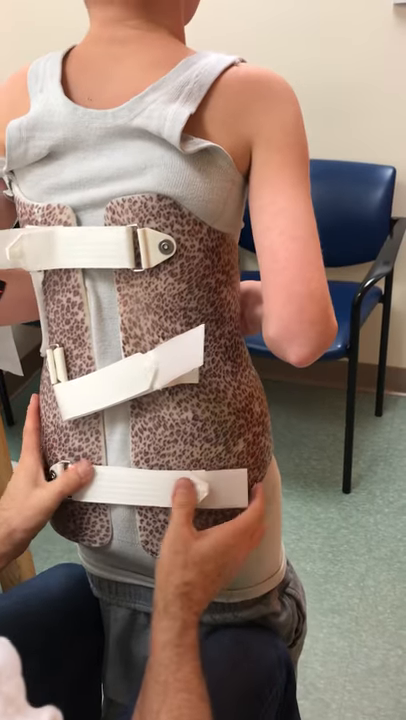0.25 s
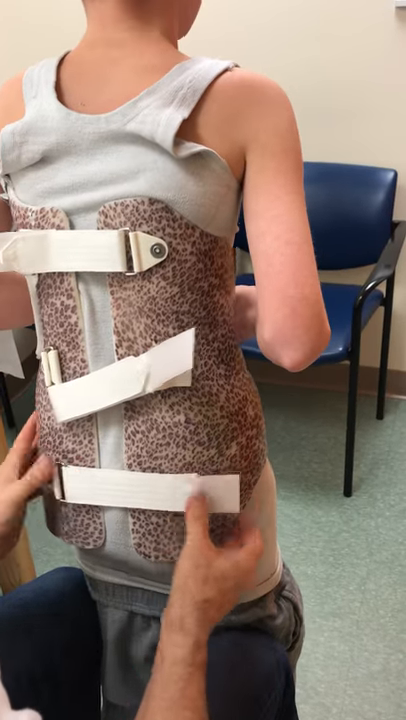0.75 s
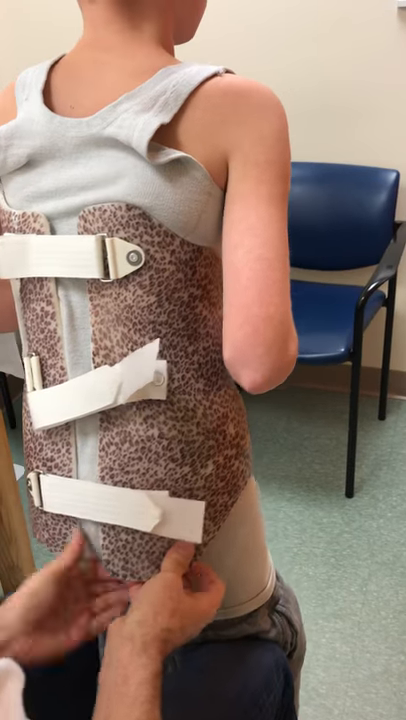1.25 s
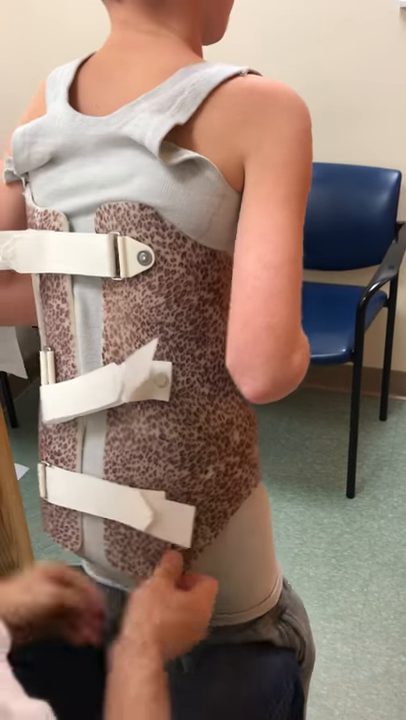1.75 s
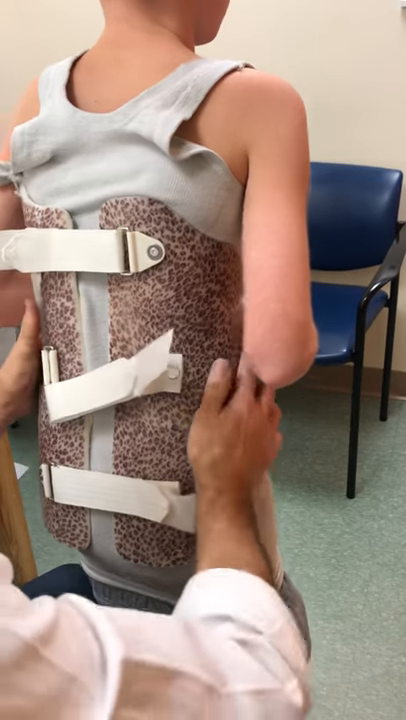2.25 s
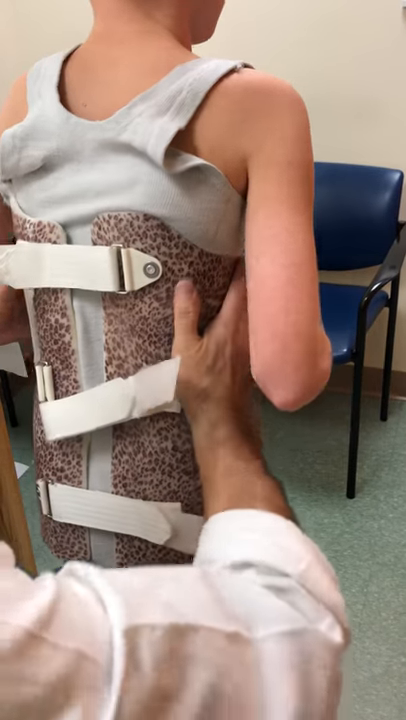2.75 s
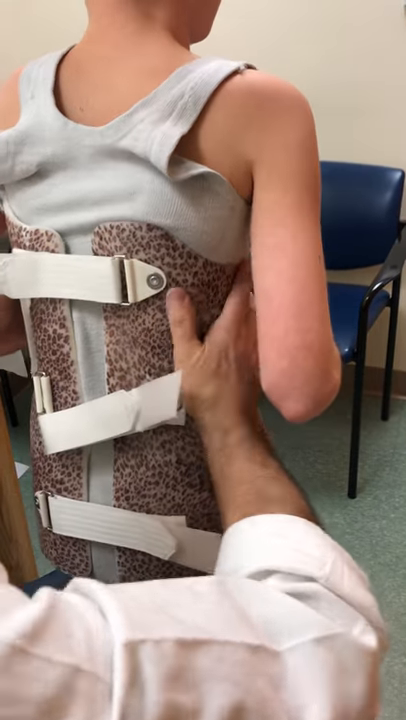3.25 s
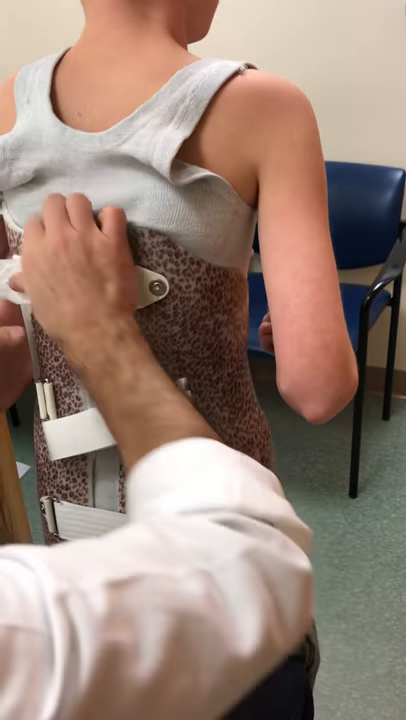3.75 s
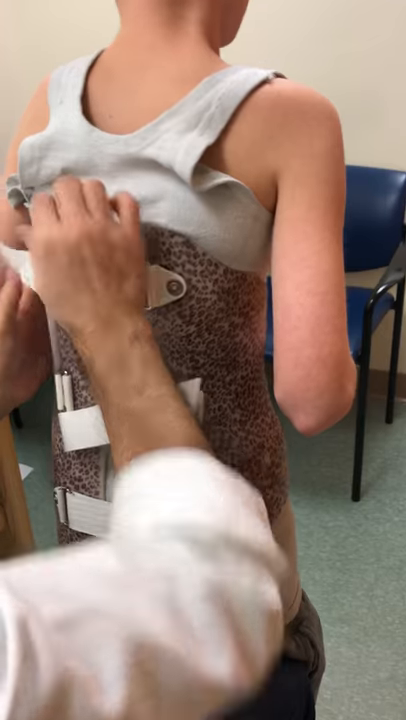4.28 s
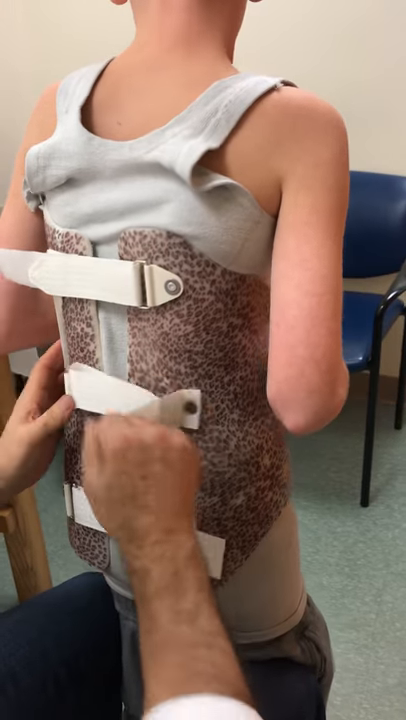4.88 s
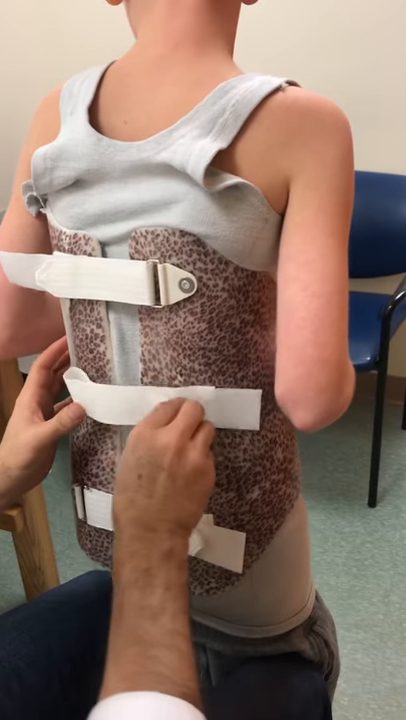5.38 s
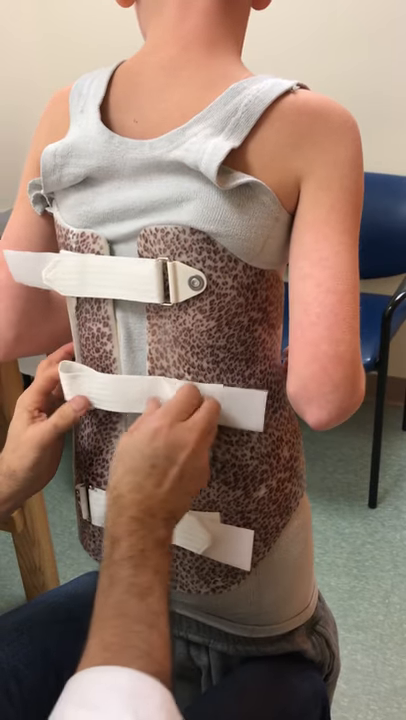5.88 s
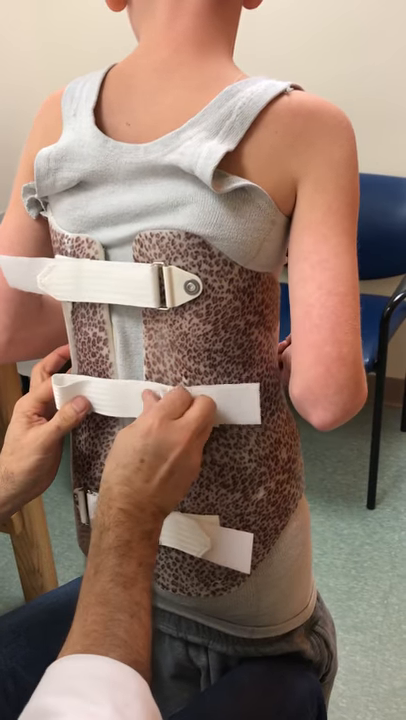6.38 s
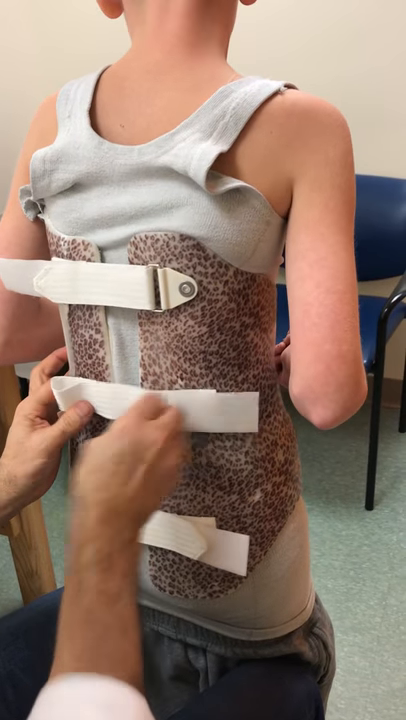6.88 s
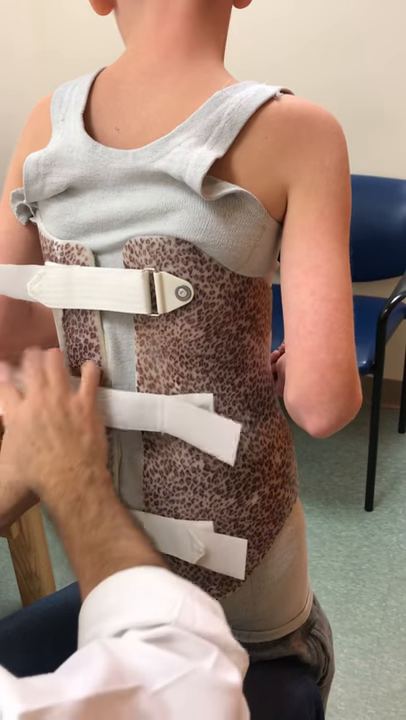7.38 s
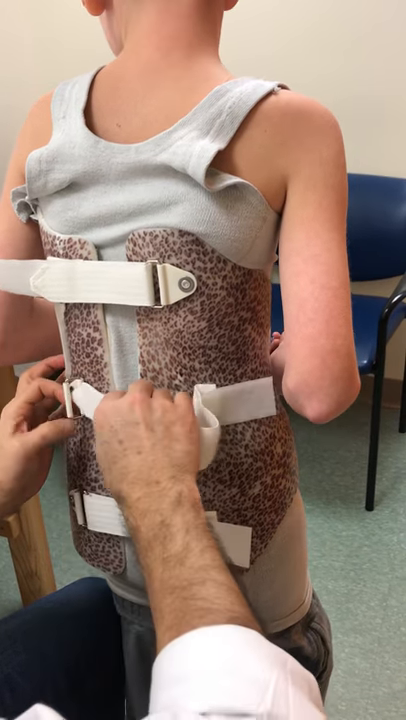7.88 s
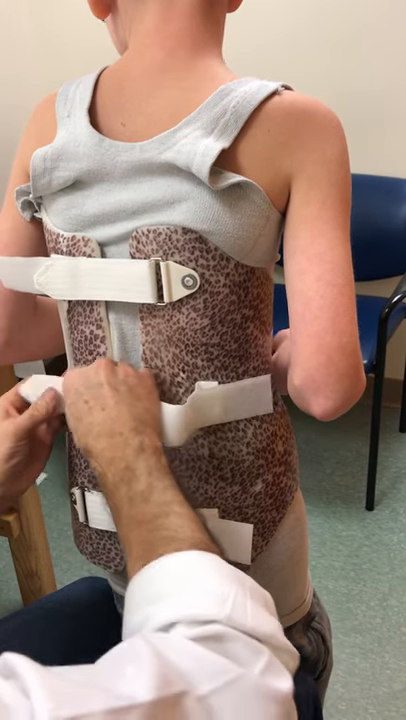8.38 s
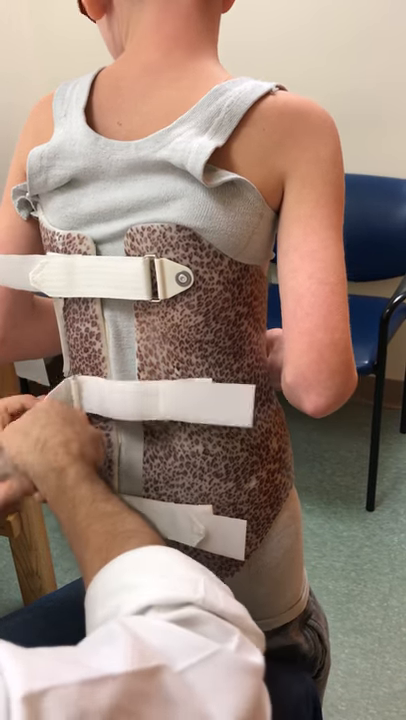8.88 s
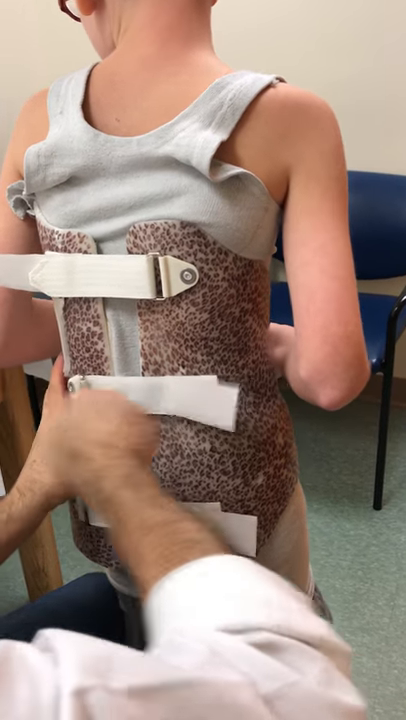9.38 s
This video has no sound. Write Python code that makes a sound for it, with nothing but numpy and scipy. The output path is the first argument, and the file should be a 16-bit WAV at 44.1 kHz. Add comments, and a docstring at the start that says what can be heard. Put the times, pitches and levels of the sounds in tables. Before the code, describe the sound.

Close up in a small quiet room, hands brush over a hard plastic back brace with soft, uneven rustles and tiny hook-and-loop ticks. After a quieter stretch of handling and a few hollow knocks, a strap rips in two quick, harsh bursts in the middle. Brisk fabric scuffs, webbing drags and faint snaps follow. A low mains hum and soft air rush stay underneath.

```python
"""Hook-and-loop straps of a stiff plastic back brace snap and rip as hands adjust them in a small room.
Hooks are noise cracks with a short ring: single as a strap is picked at, in dense runs for two pulls and drags.
Fingers and buckles knock or judder on the shell as damped sines; rubbing and rustling are coloured noise catches.
A faint mains hum of wavering sines and a low rush of noise lie beneath; decaying noise gives the room's answer."""
import sys
import numpy as np
from scipy import signal
from scipy.fft import rfft, irfft, next_fast_len
from scipy.io import wavfile
from scipy.ndimage import map_coordinates

SR = 44100
rng = np.random.default_rng(int(sys.argv[2]) if len(sys.argv) > 2 else 0)


def transcribe(signal):
    """Save signal, clipped to [-1, 1], as a 16-bit WAV file at the path in sys.argv[1]."""
    frames = np.atleast_2d(signal).T
    limited = np.clip(frames, -1, 1)
    pcm = np.round(limited * 32767).astype(np.int16)
    wavfile.write(sys.argv[1], SR, pcm)


N = 425124

# Levels below are relative: each layer adds its own trim.
# Single hooks letting go, from faint ticks to sharp snaps.
# Each row: time in seconds, level in dB, ring in Hz, brightness in dB.
HOOK_SNAPS = [(0.0605, -34.5, 3520, -2), (0.226, -43, 6800, -3), (0.3355, -39, 3520, -19),
              (0.4, -37.5, 2580, -18), (0.5517, -40.5, 5300, -5), (0.649, -27, 3700, -31),
              (0.698, -30.5, 3740, -34), (0.7436, -31.5, 3540, -20), (0.8317, -36, 3520, -4),
              (0.8936, -31, 6700, -12), (0.9015, -31.5, 3930, -13), (0.9965, -41, 5400, 3),
              (1.489, -37, 7600, 5), (1.5322, -34, 3720, 6), (1.631, -36, 3760, 7),
              (2.0363, -32, 4630, -22), (2.2188, -39, 4560, 7), (2.278, -36, 4450, -5),
              (2.9035, -52, 5500, -17), (2.9603, -43, 6100, -33), (3.053, -49.5, 4000, -1),
              (3.0957, -41, 7600, 11), (3.215, -48, 2200, -10), (3.2593, -41.5, 2170, -28),
              (3.285, -52, 3000, -22), (3.3473, -54, 2780, -36), (3.388, -52, 2400, -24),
              (3.8184, -33.5, 5700, 6), (4.098, -40, 4200, -8), (4.3337, -31, 2050, -5),
              (4.4853, -39.5, 7300, -1), (4.7138, -33, 2820, -14), (5.0948, -28, 4460, 1),
              (5.365, -34, 4250, 0), (5.545, -39.5, 4570, -6), (5.6971, -37, 3600, 0.5),
              (5.7691, -37, 6030, -2), (5.8544, -38.5, 2830, 3), (6.0026, -36.5, 7300, 1),
              (6.0933, -35.5, 2820, -4), (6.3029, -35, 3900, 6), (6.321, -38, 3800, 3),
              (6.3247, -33, 3100, -1), (6.3336, -17, 2650, 3), (6.3417, -33, 3000, 3),
              (6.3563, -22.5, 3020, -9), (6.372, -21.5, 3740, -14), (6.376, -24, 7050, -5),
              (6.3927, -22.5, 5300, 1.5), (6.4285, -32, 2760, -9), (6.5843, -36, 2730, -6),
              (6.6143, -20, 3900, 0), (6.6185, -16.5, 2520, -8), (6.629, -19.5, 3020, -2),
              (6.6497, -18, 3920, -11), (6.6791, -23, 3300, -20), (6.6941, -27, 6500, -7),
              (6.9021, -22.5, 4370, -10), (6.952, -30, 3900, 4), (6.9569, -16.5, 4100, -17),
              (7.441, -33.5, 3660, 10), (7.5963, -38.5, 6000, 21), (7.8398, -33, 6400, 7),
              (8.063, -33, 7240, 7), (8.092, -32, 6200, 2), (8.122, -34.5, 7000, -2),
              (8.2249, -37, 6500, -8), (8.7507, -33.5, 7340, 11), (9.181, -31, 7600, 12),
              (9.201, -37, 7500, 23), (9.4115, -37.5, 5950, 4), (9.441, -37, 6460, 11)]
# Fingers, strap ends and buckles meeting the shell.
# Each row: time in seconds, level in dB, pitch in Hz, crack over ring in dB.
SHELL_KNOCKS = [(1.0342, -49.5, 368, -4), (1.343, -42, 1230, 4), (1.672, -52.5, 900, -4),
                (1.883, -42.5, 670, -18), (1.528, -46, 1230, -4), (2.9285, -52, 1120, -15),
                (3.029, -50, 1310, -3.5), (3.1213, -46, 720, -1.5), (3.8952, -41.5, 890, -16),
                (4.203, -50, 1300, 1), (4.3334, -36.5, 1590, -4), (4.7855, -40, 726, 6),
                (4.8963, -27, 1170, -2.5), (5.1531, -40, 1000, 2), (5.3737, -37.5, 1800, 0),
                (5.3772, -39.5, 1410, 0), (6.5143, -42.5, 1240, -1), (7.8383, -43.5, 2000, -1),
                (7.902, -40.5, 1020, 7), (8.0587, -43.5, 630, -2), (8.096, -44, 603, 2),
                (8.1286, -43, 680, -20), (8.2578, -48, 870, 4), (8.37, -49, 696, -1), (8.385, -48, 1900, 0),
                (8.662, -40, 740, -1.5)]
# A fingertip juddering over the plastic. Each row: start in seconds, length in seconds, level in dB, pitch in Hz.
FINGER_JUDDERS = [(3.404, 0.047, -49.5, 724), (3.49, .026, -51, 710), (5.145, .045, -54, 344),
                  (8.003, .3, -59, 645), (8.466, .04, -49.5, 414), (8.599, .11, -57, 630)]
# Tone of the hooks. Each row: frequency in Hz, gain in dB.
HOOK_TONE = [(100, -24), (400, -13), (900, -7), (1700, -7), (2500, -0.5), (3600, 1), (5000, 1), (7000, 1.5),
             (10000, 0), (16000, 3)]
# Tone of palms rubbing the hollow shell. Each row: frequency in Hz, level in dB per Hz.
RUB_TONE = [(100, -30.5), (300, -1), (480, -7.5), (640, 0.5), (900, -2.5), (1600, 0), (2400, -2.5),
            (4000, -12.5), (9000, -47)]
# Tone of sleeves and webbing. Each row: frequency in Hz, level in dB per Hz.
CLOTH_TONE = [(600, -27), (1800, -20.5), (2800, -1), (3700, 1.5), (5000, -1), (6700, 1), (9000, -13.5),
              (12000, -9.5)]
# Tone of the fine fibre hiss. Each row: frequency in Hz, level in dB per Hz.
HISS_TONE = [(4000, -30.5), (7500, -11.5), (9000, -1.5), (10400, -12.5), (12000, -3), (16000, -8.5)]
# Tone of the room's low rush. Each row: frequency in Hz, level in dB per Hz.
AIR_TONE = [(20, -22.5), (35, -18), (55, 6.5), (80, -3.5), (130, -7.5), (190, -7.5), (280, -13), (450, -19),
            (1000, -26), (3000, -28), (16000, -38)]
# Mains hum partials. Each row: frequency in Hz, level in dB about which it wavers.
HUM_PARTIALS = [(59.2, -62.5), (117.5, -81), (176.2, -64.5), (233, -73)]
# Decay of the room. Each row: frequency in Hz, time to fall 60 dB in seconds.
ROOM_DECAY = [(200, 0.42), (800, 0.24), (2000, 0.22), (5000, 0.2), (10000, 0.17), (16000, 0.12)]
# Tone of a hard contact. Each row: frequency in Hz, gain in dB.
CRACK_TONE = [(300, -65), (1200, -21), (2200, 1), (3700, 5.5), (5000, -3.5), (9000, -3.5), (16000, -7)]
# Strokes of a hand, sleeve or strap over the brace. Each row: start in seconds, length in seconds,
# cloth level in dB, shell rub over cloth in dB, fine hiss over cloth in dB.
HAND_STROKES = [(0.0, 0.24, -55.5, -8, 0), (0.2, 0.23, -52, -14, -7), (0.433, 0.17, -57, -8.5, 0),
                (0.537, 0.26, -50.5, -11, -3), (0.807, 0.16, -55.5, -5.5, -4),
                (0.96, 0.12, -62.5, -1.5, -2), (1.34, 0.24, -63.5, -7, 1), (1.466, 0.094, -49, -9, 0),
                (1.616, 0.28, -61, -2, -3.5), (2.115, 0.081, -61.5, 0.5, -3), (2.257, 0.06, -62, -10, -7),
                (2.426, 0.15, -64.5, 1, -6), (2.503, 0.16, -60, -4.5, -1.5), (2.676, 0.15, -70, -2, -1),
                (2.828, 0.08, -63.5, -3, 0), (2.917, 0.13, -74.5, 8, -18), (3.086, 0.3, -69, 5.5, -11),
                (3.478, 0.067, -66, -5, 6), (3.783, 0.19, -52.5, -11, 1.5),
                (4.015, 0.15, -51.5, -13.5, -4.5), (4.177, 0.23, -54.5, -11, -4.5),
                (4.47, 0.057, -61, 0, 2), (4.691, 0.086, -57, -2, -8), (4.771, 0.1, -53, 0, -4),
                (5.076, 0.094, -51, 2, -2), (5.304, 0.13, -55, -4, -6), (5.422, 0.13, -52.5, -15, -7),
                (5.62, 0.35, -60, -5.5, -3), (5.951, 0.074, -48.5, -12.5, -6), (6.042, 0.066, -55, -8, -13),
                (6.14, 0.25, -64.5, -20, 1.5), (6.287, 0.32, -54.5, -8, -10),
                (6.728, 0.2, -53.5, -13, -6.5), (7.209, 0.2, -59.5, -1.5, -2), (7.329, 0.06, -49, -10.5, 2),
                (7.422, 0.086, -51.5, -0.5, -6), (7.542, 0.08, -53.5, -1.5, 1),
                (7.696, 0.07, -58.5, -9, 4.5), (7.829, 0.074, -57.5, -8, -13), (8.002, 0.04, -59, 0, -5),
                (8.048, 0.09, -50.5, -3, -11), (8.25, 0.054, -49, -5, -5), (8.335, 0.13, -56, -4, 2.5),
                (8.441, 0.083, -46, -6, -8), (8.553, 0.072, -49, -3.5, -6), (8.644, 0.077, -56, 2.5, -2),
                (8.757, 0.13, -47.5, -7, 1), (8.946, 0.09, -45, -8.5, -2), (9.077, 0.16, -50, -15.5, 3),
                (9.243, 0.06, -59.5, -15, 2), (9.404, 0.12, -51.5, -15, 2), (9.592, 0.083, -61, -14, 0)]
# The two pulls that rip the strap open.
# Each row: time in seconds, level in dB, brightness in dB, flap of the loose strap in dB.
FIRST_RIP = [(6.614, -27, -8, -8), (6.627, -20.5, -14, -9), (6.638, -27, -4.5, -9.5),
             (6.682, -28.5, -16, -12)]
SECOND_RIP = [(6.941, -22.5, -0.5, -17), (6.963, -21, 2, -26), (6.985, -15.5, -4.5, -38),
              (7.0, -19, -7.5, -17), (7.025, -19, 6.5, -13.5), (7.048, -14, -0.5, -17.5),
              (7.077, -15.5, -1, -12)]
# A strap dragging over hooks or through its buckle. Each row: start in seconds, length in seconds,
# level in dB, hooks a second, ring in Hz, brightness in dB, flap in dB.
STRAP_DRAGS = [(0.385, 0.03, -44, 720, 3670, -4, -4.5), (3.81, 0.08, -49, 610, 6040, -3, -22),
               (4.34, 0.023, -42.5, 590, 3640, -12, -19), (5.1, 0.049, -39, 1200, 3560, -1, -21),
               (6.84, 0.034, -41.5, 500, 3250, -3.5, -18.5), (6.902, 0.029, -38, 420, 3400, -5, -28),
               (8.777, 0.087, -42.5, 1680, 4240, -3.5, -3.5), (5.363, 0.025, -50.5, 1200, 2570, -16, 3),
               (5.456, 0.013, -42, 560, 3800, -3, -8), (9.475, 0.05, -47, 1600, 2960, -9, -34)]
# A click reaches three nearby surfaces one after another. Each entry: delay in seconds.
SURFACE_DELAYS = [0.0, 0.0023, 0.0051]

ATTACK_S, ARCH_DB, RELEASE_DB_PER_S = 0.013, 3.5, 282  # a stroke's rise, swell at its middle, and fall
SLOW_RATE, FAST_RATE, FAST_DB = 550, 2800, -15  # hooks a second at the slowest; more added at this pull level
RING_CYCLES = 0.36  # time constant of the shell's ring, in cycles of its pitch
FIDGET_DB = -74  # clothes never lie quite still between strokes
TOP_HZ = 16050  # band limit


def amp(db):
    """Decibels to amplitude."""
    return 10 ** (np.asarray(db) / 20)


def unit(x):
    """x at rms 1."""
    return x / np.sqrt(np.mean(x ** 2) + 1e-20)


def unit_rows(x):
    """Each row at energy 1."""
    return x / (np.linalg.norm(x, axis=-1, keepdims=True) + 1e-12)


def along(points, hz):
    """(Hz, value) points read on a log frequency axis."""
    f, v = np.transpose(points)
    return np.interp(np.log(hz + 1), np.log(f), v)


def wobble(rate):
    """A smooth random curve, rate knots a second."""
    knots = rng.standard_normal(int(N * rate / SR) + 4)
    return map_coordinates(knots, [np.arange(N) * rate / SR])


def filtered(x, response):
    """x times a response of frequency."""
    m = next_fast_len(N + SR // 2)
    return irfft(rfft(x, m) * response(np.fft.rfftfreq(m, 1 / SR)), m)[:N]


def coloured(x, points, size=2048):
    """x through a causal filter with the given (Hz, dB) gains."""
    # folding the cepstrum forward gives minimum phase, so no sound runs ahead of its click
    cepstrum = irfft(np.log(amp(along(points, np.fft.rfftfreq(size, 1 / SR)))))
    cepstrum[1:size // 2] *= 2
    cepstrum[size // 2 + 1:] = 0
    return signal.oaconvolve(x, irfft(np.exp(rfft(cepstrum))))[:N]


def placed(times, rows):
    """Short sounds, one a row, summed at their start times."""
    at = np.round(np.abs(times) * SR).astype(int)[:, None] + np.arange(rows.shape[1])
    return np.bincount(at.ravel(), rows.ravel(), N)[:N]


def strokes():
    """Strength of shell rub, cloth and hiss: each stroke rises, swells as the hand speeds up, and dies away."""
    power, t = np.zeros((3, N + SR)), np.arange(SR) / SR
    for start, length, db, rub_db, hiss_db in HAND_STROKES:
        arch = (2 * np.minimum(t / length, 1) - 1) ** 2
        fall_db = RELEASE_DB_PER_S * np.maximum(t - length, 0)
        shape = np.minimum(t / ATTACK_S, 1) * amp(db - ARCH_DB * arch - fall_db)
        first = round(start * SR)
        power[:, first:first + SR] += (amp([[rub_db], [0], [hiss_db]]) * shape) ** 2
    return np.sqrt(power[:, :N])


def friction(spectrum, rate, scatter_db, smooth_db, size=40):
    """Fibres catching at random, rate a second, over a smooth rush; rms 1."""
    rush = rng.standard_normal(N)
    times = rng.random(int(rate * N / SR)) * N / SR
    force = amp(scatter_db * np.minimum(rng.standard_normal(len(times)), 2))
    bursts = rng.standard_normal((len(times), size)) * np.exp(-4 * np.arange(size) / size)
    catches = placed(times, force[:, None] * bursts)
    return unit(coloured(unit(catches) + amp(smooth_db) * rush, spectrum))


def hooks(ring_hz, bright_db, ring_db, spread, ring_s=0.00019, crack_s=0.00033,
          squeeze=12.0, split_hz=8000, size=128):
    """One snap a row: a crack of about a millisecond and a few cycles of the taut backing."""
    t = np.arange(size) / SR
    draw = rng.standard_normal((len(bright_db), size + 1))
    crack = np.tanh(squeeze * draw[:, 1:]) * t * np.exp(-t / crack_s)

    def band(side):
        return unit_rows(signal.sosfilt(signal.butter(4, split_hz, side, fs=SR, output='sos'), crack))

    pitch = ring_hz[:, None] * np.exp(spread * draw[:, :1])
    ring = unit_rows(np.sin(2 * np.pi * pitch * t) * t * np.exp(-t / ring_s))
    body = unit_rows(band('low') + amp(ring_db) * ring)
    return unit_rows(body + amp(bright_db)[:, None] * band('high'))


def stray_hooks(touch, rate=14, level_db=-26, follow=0.97, scatter_db=3.0, ring_hz=5000, bright_db=1.5):
    """Faint hooks catch at random, harder under a hand that presses harder."""
    count = int(rate * N / SR)
    when, strength = rng.random(count), np.minimum(rng.standard_normal(count), 1.8)
    pressure = unit(touch)[(when * N).astype(int)] ** follow
    force = pressure * amp(level_db + scatter_db * strength)
    grains = hooks(np.full(count, ring_hz), np.full(count, bright_db), ring_db=-3.0, spread=0.29, ring_s=0.000083)
    return coloured(placed(when * N / SR, force[:, None] * grains), HOOK_TONE)


def stray_taps(touch, rate=22, level_db=-33, scatter_db=3.0, pitch_hz=1000, spread=0.44, size=300):
    """Fingertips and strap edges bump the shell at random as they rub along it."""
    count, t = int(rate * N / SR), np.arange(size) / SR
    when = rng.random(count)
    strength, pitch = np.clip(rng.standard_normal((count, 2)), -2, 2).T
    hz = pitch_hz * np.exp(spread * pitch)[:, None]
    ring = unit_rows(np.sin(2 * np.pi * hz * t) * t * np.exp(-hz * t / RING_CYCLES))
    force = unit(touch)[(when * N).astype(int)] * amp(level_db + scatter_db * strength)
    return placed(when * N / SR, force[:, None] * ring)


def sliding(cloth_db=-0.4, hiss_db=0.45, unsteady_db=2.5, fidget_db=4.0):
    """Palms rub the hollow shell while sleeves and webbing rustle; one unsteady stroke drives them all."""
    rub, cloth, hiss = np.hypot(strokes(), amp(FIDGET_DB + fidget_db * wobble(8)))
    shell = rub * friction(RUB_TONE, rate=700, scatter_db=4.0, smooth_db=-2.5)
    weave = amp(cloth_db) * cloth * friction(CLOTH_TONE, rate=400, scatter_db=12.0, smooth_db=0.5)
    fibres = amp(hiss_db) * hiss * friction(HISS_TONE, rate=600, scatter_db=2.5, smooth_db=-6.5)
    unsteady = amp(unsteady_db * wobble(35))
    return unsteady * (shell + weave + fibres) + stray_hooks(cloth) + stray_taps(rub)


def background(air_db=-58, waver_db=3.0, drift=0.9):
    """A mains hum, wavering in level and phase (drift in radians), over the low rush of the room."""
    t, hum = np.arange(N) / SR, np.zeros(N)
    for hz, db in HUM_PARTIALS:
        level = np.sqrt(2) * amp(db + waver_db * wobble(7.7))
        hum += level * np.sin(2 * np.pi * hz * t + drift * wobble(2.4))
    rush = filtered(rng.standard_normal(N), lambda hz: amp(along(AIR_TONE, hz)))
    return hum + amp(air_db) * unit(rush)


def snaps(gain_db=20, bright_trim_db=-1.5):
    """Hooks give way one at a time while the strap is picked at or strained."""
    s, db, hz, bright_db = np.transpose(HOOK_SNAPS)
    grains = hooks(hz, bright_db + bright_trim_db, ring_db=1.5, spread=0.0097, ring_s=0.00026)
    return coloured(placed(s, amp(db + gain_db)[:, None] * grains), HOOK_TONE)


def peel(s, db, rate, ring_hz, bright_db, flap_db, flap_trim_db=5, edge_db=2, scatter_db=5,
         flap_hz=900, flap_s=0.00049, size=128):
    """A peeling edge frees hooks in a dense run; each also flicks the loose strap like a small drumskin."""
    clock, t = np.arange(s[0], s[-1], 1 / SR), np.arange(size) / SR

    def at(times, values):
        return np.interp(times, s, values * np.ones(len(s)))

    # the running count of freed hooks, read backwards, gives each hook its moment
    freed = np.cumsum(at(clock, rate)) / SR
    count = max(int(freed[-1]), 2)
    times = np.interp(np.arange(count) + rng.random(count), freed, clock)
    strength, pitch, side = rng.standard_normal((count, 3)).T
    flap_pitch = flap_hz * np.exp(.4 * pitch)[:, None]
    flap = unit_rows(np.sin(2 * np.pi * flap_pitch * t) * np.exp(-t / flap_s))
    grains = hooks(at(times, ring_hz), at(times, bright_db) + edge_db, ring_db=0.5, spread=0.15)
    grains += amp(at(times, flap_db) + flap_trim_db)[:, None] * flap
    scatter = np.sign(side) * unit(amp(scatter_db * np.minimum(strength, 1.7)))
    # denser hooks are each made quieter, so the run holds its level
    force = scatter * amp(at(times, db)) * np.sqrt(SR / at(times, rate))
    return placed(times, grains * force[:, None])


def peels(clump_db=1.0, first_hz=3100, second_hz=3600):
    """The two pulls, where a harder pull frees hooks faster, and the short, even drags."""
    out = np.zeros(N)
    for pull, hz in ((FIRST_RIP, first_hz), (SECOND_RIP, second_hz)):
        s, db, bright_db, flap_db = np.transpose(pull)
        rate = SLOW_RATE + FAST_RATE * amp(db - FAST_DB) ** 2
        out += peel(s, db, rate, hz, bright_db, flap_db)
    for start, length, *drag in STRAP_DRAGS:
        out += peel([start, start + length], *drag)
    # rows of hooks hold and give way together, so the run comes in quick clumps
    clumps = unit(amp(clump_db * np.tanh(wobble(300))))
    return coloured(out * clumps, HOOK_TONE)


def knocks(low_hz=230, gain_db=23, crack_db=2, crack_s=0.00053, thud_hz=330, thud_db=-14,
           thud_s=0.00097, size=700):
    """The shell, damped by the body inside, rings briefly over a soft thud; hard contacts add a crack."""
    s, db, hz, hard_db = np.transpose(SHELL_KNOCKS)[:, :, None]
    t = np.arange(size) / SR
    ring = unit_rows(np.sin(2 * np.pi * hz * t) * t * np.exp(-hz * t / RING_CYCLES))
    thud = amp(thud_db) * unit_rows(np.sin(2 * np.pi * thud_hz * t) * t * np.exp(-t / thud_s))
    noise = np.tanh(2 * rng.standard_normal((len(s), size)))
    crack = unit_rows(noise * t * np.exp(-t / crack_s))
    force = amp(db + gain_db)
    # the knocks carry little bass
    low_cut = signal.butter(3, low_hz, 'high', fs=SR, output='sos')
    body = signal.sosfilt(low_cut, placed(s[:, 0], force * (ring + thud)))
    return body + coloured(placed(s[:, 0], force * amp(hard_db + crack_db) * crack), CRACK_TONE)


def judders(slip_rate=300, ring_s=0.0011, spread=0.011, size=400):
    """Skin sticks and slips on the shell, slip_rate times a second, each slip ringing it softly."""
    out, t = np.zeros(N), np.arange(size) / SR
    for start, length, db, hz in FINGER_JUDDERS:
        count = max(int(length * slip_rate), 2)
        where = (np.arange(count) + rng.random(count)) / count
        pitch = hz * np.exp(spread * rng.standard_normal((count, 1)))
        ring = unit_rows(np.sin(2 * np.pi * pitch * t) * np.sqrt(t) * np.exp(-t / ring_s))
        swell = np.sin(np.pi * where)[:, None]
        out += placed(start + length * where, swell * ring) * amp(db) * np.sqrt(SR / slip_rate)
    return out


def scattered(source):
    """A click leaves in each direction with another fine colour, so each delayed path is drawn afresh."""
    paths = [np.pad(source(), (round(delay * SR), 0))[:N] for delay in SURFACE_DELAYS]
    return sum(paths) / np.sqrt(len(paths))


def room(x, build_s=0.00033, count=6):
    """The walls' short answer as decaying noise; six draws take turns, a quarter second each."""
    hz, t, z = signal.stft(rng.standard_normal((count, SR // 2)), SR, nperseg=256)
    decay = amp(-60 * t / along(ROOM_DECAY, hz)[:, None])
    tails = signal.istft(z * decay, SR, nperseg=256)[1]
    tails = unit_rows(tails * (1 - np.exp(-np.arange(tails.shape[1]) / (SR * build_s))))
    turn = np.arange(N) // (SR // 4) % count
    return sum(signal.oaconvolve(x * (turn == k), tail)[:N] for k, tail in enumerate(tails))


def scene(snap_wet_db=-9.0, strap_wet_db=-6.5, shell_wet_db=-4.5, slide_wet_db=-9):
    """Straps face the listener; the shell radiates all round and stirs the room more."""
    rips, hands, skin = peels(), sliding(), judders()
    direct = snaps() + rips + knocks() + skin + hands
    outward = amp(snap_wet_db) * scattered(snaps) + amp(strap_wet_db) * rips
    outward += amp(shell_wet_db) * (knocks() + skin) + amp(slide_wet_db) * hands
    return (direct + room(outward) + background())[None]


def record(dry):
    """The highest peaks are rounded off; a very steep low-pass then cuts above the band limit."""
    rounded = dry[0] / (1 + (dry[0] / 0.85) ** 8) ** (1 / 8)
    return filtered(rounded, lambda hz: 1 / np.sqrt(1 + (hz / TOP_HZ) ** 160))[None]


dry = scene()
out = record(dry)
transcribe(out)
```